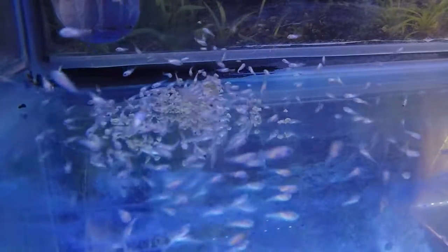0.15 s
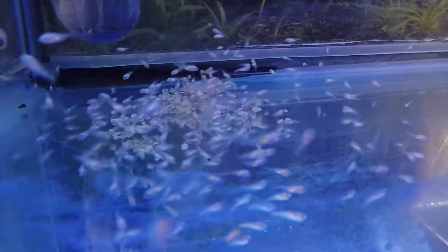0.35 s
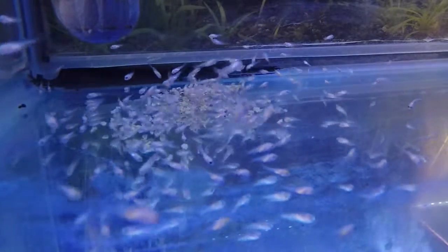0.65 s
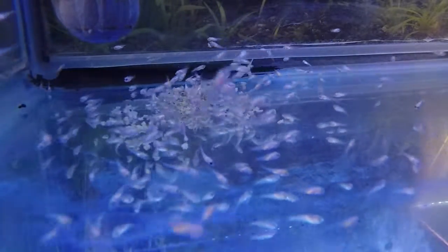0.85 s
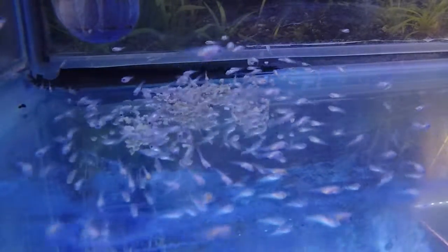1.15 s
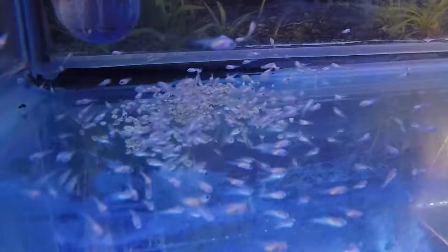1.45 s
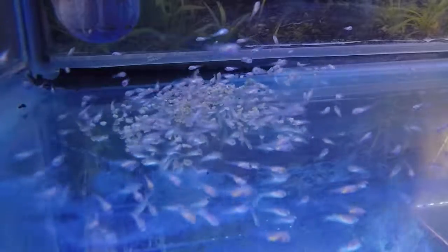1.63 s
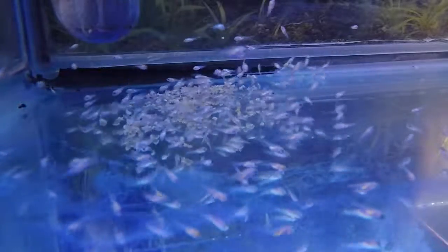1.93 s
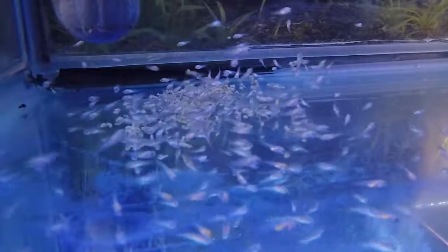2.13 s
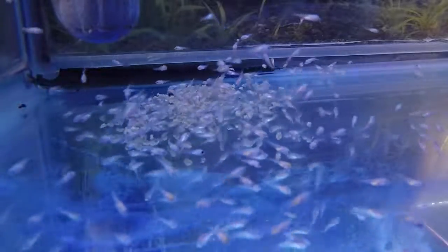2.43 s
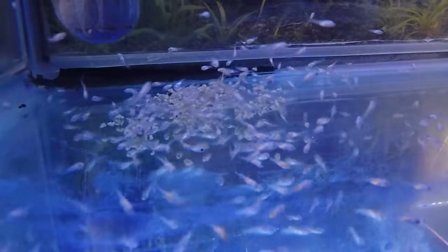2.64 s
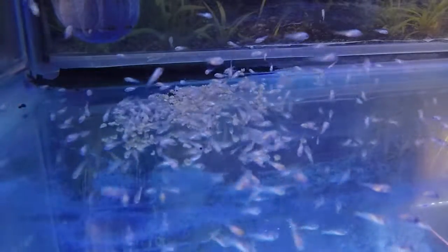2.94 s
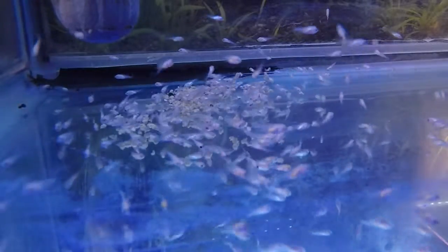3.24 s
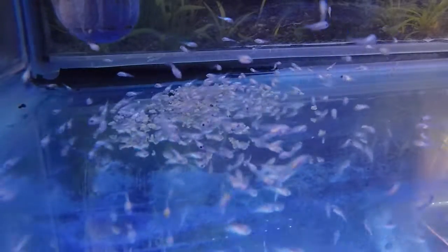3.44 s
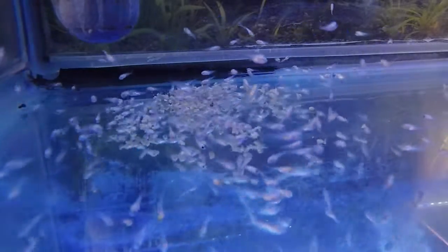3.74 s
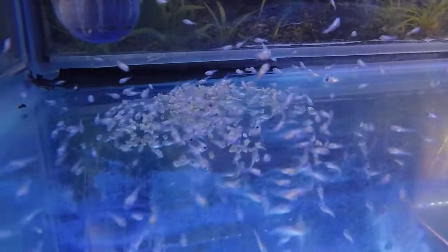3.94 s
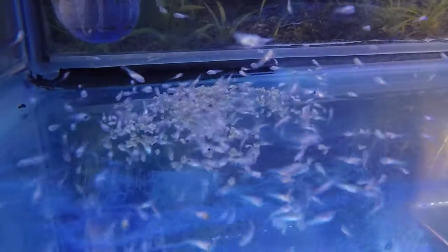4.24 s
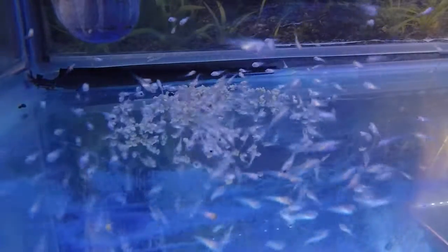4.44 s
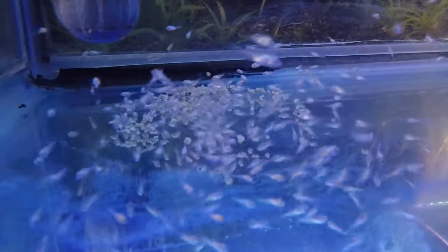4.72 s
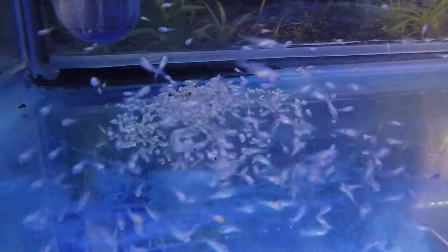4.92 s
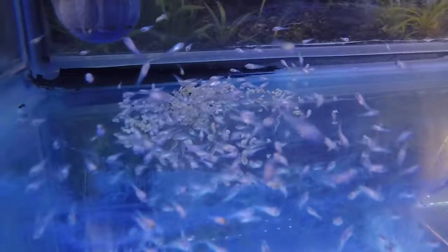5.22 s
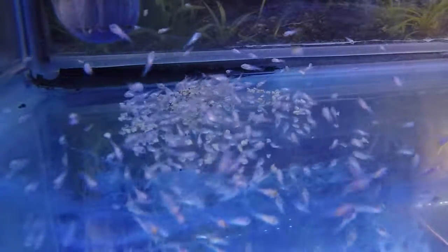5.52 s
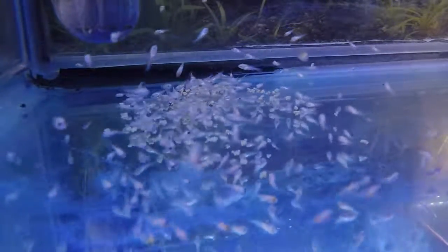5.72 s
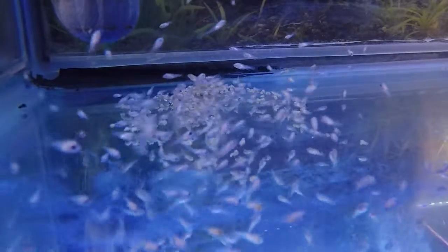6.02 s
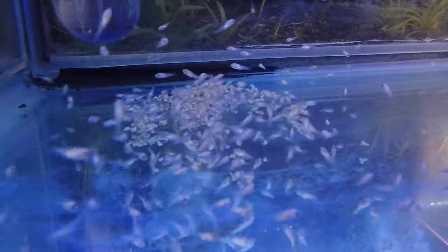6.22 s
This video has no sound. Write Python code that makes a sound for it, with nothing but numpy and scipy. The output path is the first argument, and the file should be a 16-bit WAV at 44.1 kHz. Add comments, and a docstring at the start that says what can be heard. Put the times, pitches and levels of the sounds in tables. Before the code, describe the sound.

A fish tank pump hums low and steady while water trickles and fizzes, with hollow bubble plops bursting loudest near five seconds.

```python
"""An aquarium pump hums at twice the mains frequency and shakes a glass tank in a small room.
From the start water rumbles, churns and trickles beneath a fine fizz of bursting bubbles.
Large bubbles, damped oscillators of rising pitch, plop and knock the tank amid sharp ticks and pings;
one stands out near 1 s, the trickle swells at about 1.6 s, and the strongest plops crowd near 4.9 s.
Noise and swarms of damped sines, shaped by resonances, make the water; pops leave a room tail."""
import sys
import numpy as np
from scipy import signal
from scipy.fft import rfft, irfft, next_fast_len
from scipy.io import wavfile
from scipy.ndimage import map_coordinates

SR = 44100
rng = np.random.default_rng(int(sys.argv[2]) if len(sys.argv) > 2 else 0)


def transcribe(signal):
    """Save signal, clipped to [-1, 1], as a 16-bit WAV file at the path in sys.argv[1]."""
    frames = np.atleast_2d(signal).T
    limited = np.clip(frames, -1, 1)
    pcm = np.round(limited * 32767).astype(np.int16)
    wavfile.write(sys.argv[1], SR, pcm)


N = 280917

# the largest gurgling bubbles; the three levels are relative, each part having its own common trim:
# (time [s], plop level [dB], pitch [Hz], knock level [dB], spatter level [dB])
LARGE_BUBBLES = [(0.3333, -29, 2000, -27.5, -29.5), (0.4724, -33, 1300, -29, -56),
                 (0.7307, -22, 1240, -30, -44), (0.797, -32, 1240, -27, -56),
                 (0.9462, -14, 1323, -27.5, -26), (1.0294, -26, 1340, -44, -48),
                 (1.4326, -28.5, 1940, -55, -38), (1.695, -25, 1400, -38, -40),
                 (1.7419, -29, 1500, -40, -34.5), (2.157, -24, 1530, -35, -34.5),
                 (2.272, -29, 1660, -34, -41), (2.317, -28, 1230, -31, -36.5),
                 (2.3536, -29, 1260, -40, -38), (2.4565, -26, 1235, -32, -38),
                 (2.658, -38, 1190, -32.5, -46), (3.055, -30, 1524, -26.5, -39),
                 (3.1975, -21, 1250, -30.5, -37.5), (3.3442, -28, 1360, -31, -43),
                 (3.5918, -27, 1780, -39, -39), (3.9504, -22.5, 1414, -30, -45),
                 (4.355, -21.5, 1365, -25.5, -40), (4.4357, -31, 1690, -34.5, -44),
                 (4.7964, -32, 1410, -40, -53), (4.8408, -29, 2070, -37, -44),
                 (4.8616, -14.5, 1596, -34, -47), (4.8857, -14.5, 1210, -26.5, -50),
                 (4.9476, -10, 1386, -27, -49), (5.0644, -28, 1180, -31, -55),
                 (5.5908, -28, 1560, -46, -41), (5.691, -28, 1380, -49, -52), (5.8229, -28, 1590, -33, -47),
                 (6.1501, -22.5, 1760, -30.5, -44), (6.176, -19, 1440, -29.5, -47),
                 (6.2314, -19, 1225, -29, -40.5)]


def amp(db):
    """Level law: decibels become a pressure ratio."""
    return 10 ** (np.asarray(db) / 20)


def unit(x):
    """Normalisation of power: scale to rms 1."""
    return x / np.sqrt(np.mean(x ** 2) + 1e-20)


def along(points, hz):
    """Interpolation of (frequency [Hz], value) points on a logarithmic frequency axis."""
    f, v = np.transpose(points)
    return np.interp(np.log(hz + 1), np.log(f + 1), v)


def wobble(rate):
    """Slow random modulation: a smooth curve through rate random knots a second."""
    knots = rng.standard_normal(int(N * rate / SR) + 4)
    return map_coordinates(knots, [np.arange(N) * rate / SR])


def filtered(x, response):
    """Linear filtering: the spectrum of x times a complex response of frequency."""
    size = next_fast_len(N + SR // 2)
    return irfft(rfft(x, size) * response(np.fft.rfftfreq(size, 1 / SR)), size)[:N]


def noise(spectrum):
    """Coloured noise: white noise shaped by a spectral density, rms 1."""
    return unit(filtered(rng.standard_normal(N), lambda hz: amp(along(spectrum, hz))))


def resonate(x, modes, order=1):
    """Modal superposition: x through parallel resonances; order 2 gives steep flanks and deep valleys."""
    def response(f):
        total = 0
        for k, (center, width, db) in enumerate(modes):
            bell = 1j * f * width / (center * center - f * f + 1j * f * width)
            sign = (-1) ** (k * (order + 1))  # neighbours alternate in sign at order 2
            total = total + sign * amp(db) * bell ** order
        return total
    return filtered(x, response)


def add(track, s, sound):
    """Superposition: mix a sound into the track at s seconds."""
    part = track[max(round(s * SR), 0):][:len(sound)]
    part += sound[:len(part)]


def bubble(t, hz, t60, rise, attack):
    """Damped oscillation: a sine whose frequency climbs by the share rise over t60, passing hz at t60 / 5."""
    phase = 2 * np.pi * hz * (t + rise * t * (t / t60 / 2 - 1 / 5))
    return np.sin(phase) * amp(-60 * t / t60) * (1 - np.exp(-t / attack))


def plop(t, hz, t60, swoop, opening):
    """Oscillation of a closing cavity: the pitch swoops up to hz, then rings on; peak 1."""
    closed = 1 - np.exp(-t / opening)
    phase = 2 * np.pi * hz * (t - swoop * opening * closed)
    ring = np.sin(phase) * amp(-60 * t / t60) * closed
    return ring / np.abs(ring).max()


def swarm(count, low_hz, high_hz, t60, size_db):
    """Incoherent sum of many small bubbles of random moment, pitch, life and size, rms 1."""
    t = np.arange(min(round(t60 * SR), 4000000 // count)) / SR
    start = rng.integers(0, N, (count, 1))
    hz = low_hz + (high_hz - low_hz) * rng.random((count, 1))
    life = t60 * rng.uniform(.5, 1.5, (count, 1))
    size = amp(size_db * np.minimum(rng.exponential(size=(count, 1)), 4))
    grains = size * bubble(t, hz, life, rise=0.082, attack=life / 20)
    places = start + np.arange(len(t))
    return unit(np.bincount(places.ravel(), grains.ravel(), N)[:N])


def scattered(count, db, spread_db, low_hz, high_hz):
    """Stratified chance: (time [s], level [dB], pitch [Hz]) rows, one in each equal stretch of time."""
    when, size, pitch = rng.random((count, 3)).T
    s = (np.arange(count) + when) / count * N / SR
    return np.transpose([s, db + spread_db * (2 * size - 1), low_hz + (high_hz - low_hz) * pitch])


def pump():
    """Harmonic excitation: the magnet drive shakes the tank; overtones waver with the impeller's load."""
    # pump overtones: (multiple of the hum frequency [1], relative level [dB])
    overtones = [(1, 0.5), (2, -25.5), (3, -19), (3.5, -51), (4, -22), (5, -27), (6, -47), (7, -56),
                 (8, -27.5)]
    hum_hz = 100
    level_db = -21.5 + 0.88 * wobble(3.39)  # slow drift of the whole hum
    phase = 2 * np.pi * hum_hz * np.arange(N) / SR + 0.14 * wobble(7)
    hum = np.zeros(N)
    for order, db in overtones:
        waver_db = (order > 1) * (1.5 * wobble(9))
        hum += amp(db + waver_db) * np.sin(order * phase + rng.uniform(0, 2 * np.pi))
    return amp(level_db) * unit(hum)


def gurgles():
    """Impulsive modal excitation: a large bubble plops, knocks the tank and sheds two smaller bubbles."""
    # modes of the knocked tank: (frequency [Hz], relative level [dB], decay time t60 [s])
    knock_modes = [(506, -12, 0.073), (658, -8, 0.03), (854, -7, 0.044), (965.4, -3.5, 0.081),
                   (973, -4.5, 0.069), (1242, -15, 0.095)]
    # lesser bubbles at random moments, with knock and spatter tied to the plop
    strays = [(s, db, hz, db - 6, db - 10)
              for s, db, hz in scattered(count=18, db=-32, spread_db=0.5, low_hz=1190, high_hz=1425)]
    out, t = np.zeros(N), np.arange(SR // 6) / SR
    for s, db, hz, knock_db, spatter_db in list(LARGE_BUBBLES) + strays:
        ring = plop(t, hz, t60=0.067, swoop=0.38, opening=0.0014)
        knock = np.zeros(len(t))
        for mode_hz, mode_db, life in knock_modes:
            strength = amp(mode_db + 1.3 * rng.standard_normal()) * rng.choice([-1, 1])
            knock += strength * bubble(t, mode_hz, life, rise=0, attack=0.00035)
        knock /= np.abs(knock).max()
        spatter = np.zeros(len(t))
        for _ in range(2):
            spatter_hz = 1870 * np.exp(0.081 * rng.standard_normal())
            spatter += plop(t, spatter_hz, t60=0.043, swoop=0.21, opening=.0012)
        gurgle = amp(db - 11.5) * ring + amp(knock_db + 5.0) * knock + amp(spatter_db - 3.5) * spatter
        add(out, s, gurgle)
    return out


def wash():
    """Entrainment: each listed large bubble stirs up a short decaying rush of tiny ones under the lid."""
    rise_s, t60_s = .009, 0.12
    level, t = np.zeros(N), np.arange(SR // 4) / SR
    for s, db, *_ in LARGE_BUBBLES:
        add(level, s, amp(db - 22.5 - 60 * t / t60_s) * (1 - np.exp(-t / rise_s)))
    return level * swarm(count=6000, low_hz=950, high_hz=1960, t60=.014, size_db=2.0)


def trickle():
    """Cavity resonance: clustered small bubbles murmur under the lid, room-blurred; finer droplets tinkle."""
    # how strongly small bubbles reach the surface: (time [s], relative level [dB])
    flow = [(0.0, -49), (0.55, -50.5), (0.87, -51.5), (1.19, -51.5), (1.44, -51), (1.63, -44.5),
            (2.06, -47), (2.34, -45.5), (2.62, -52.5), (3.39, -50), (3.56, -50), (4.83, -50), (5.04, -51),
            (5.36, -51), (5.94, -48.5), (6.37, -47.5)]
    # resonances of the air under the lid: (frequency [Hz], width [Hz], relative level [dB])
    lid_modes = [(1030, 70, -9), (1218, 42, 4), (1320, 75, -1), (1390, 60, -3), (1510, 60, -7),
                 (1610, 90, -3), (1750, 140, -2), (1950, 220, -10), (2150, 130, -14)]
    flow_db = np.interp(np.arange(N) / SR, *np.transpose(flow))
    bubbles = swarm(count=2200, low_hz=990, high_hz=2118, t60=0.038, size_db=2.5)
    bubbles = bubbles + amp(-5.0) * room(bubbles)
    under_lid = unit(resonate(bubbles, lid_modes, order=2))
    murmur = unit(under_lid + amp(-12) * unit(bubbles))
    droplets = swarm(count=700, low_hz=1976, high_hz=3430, t60=0.029, size_db=4)
    cluster_db = 2.3 * wobble(14)
    return amp(flow_db - 0.5 + cluster_db) * murmur + amp(-62.5) * droplets


def lid_ring():
    """Sustained resonance: runs of like-sized bubbles, as swells of noise, keep the lid's air ringing."""
    # the lid's sharpest resonance: (frequency [Hz], width [Hz], relative level [dB])
    sharp_mode = [(1218.5, 27, 0)]
    # runs of bubbles: (middle time [s], length [s], level [dB])
    bubble_runs = [(0.737, 0.11, -46), (2.42, 0.2, -50), (5.17, 0.25, -44)]
    t = np.arange(N) / SR
    swell = sum(amp(db) * np.exp(-np.abs(2 * (t - s) / length) ** 2) for s, length, db in bubble_runs)
    return swell * unit(resonate(rng.standard_normal(N), sharp_mode, order=2))


def fizz():
    """Broadband excitation of modes: tiny bubbles, each at its own pitch, ring the glass and rim."""
    # high resonances of the glass and rim: (frequency [Hz], width [Hz], relative level [dB])
    rim_modes = [(3230, 800, -14), (3595, 110, 0.5), (4344, 170, -8.5), (4700, 460, -31),
                 (5120, 130, -21.5), (5560, 230, -13.5), (6115, 430, -14), (8080, 320, -24.5),
                 (8570, 400, -21.5), (9660, 790, -27.5), (10400, 580, -22), (11700, 1200, -29.5),
                 (12700, 600, -32), (14000, 950, -27.5), (15800, 500, -10.5)]
    fine = swarm(count=5500, low_hz=2510, high_hz=6850, t60=0.0048, size_db=3.5)
    finest = swarm(count=9000, low_hz=7140, high_hz=14700, t60=0.0025, size_db=3.5)
    spray = fine + amp(2.5) * finest + amp(2.5) * rng.standard_normal(N)
    return amp(-49 + 0.44 * wobble(13)) * unit(resonate(spray, rim_modes, order=2))


def ticks():
    """Transient radiation: a sharp burst is a short noise crack with a high damped ping."""
    # sharp bursts at the surface: (time [s], relative level of the ping [dB], pitch [Hz])
    sharp_bursts = [(1.2797, -35, 6400), (1.3835, -37, 13090), (1.6368, -35, 13950), (1.9952, -33, 10800),
                    (2.269, -30, 10100), (2.7288, -33, 6850), (2.9109, -34, 10160), (3.0441, -42, 9130),
                    (4.6779, -32, 14990), (4.9728, -28, 6200), (5.5029, -23, 4160)]
    faint = scattered(count=16, db=-44, spread_db=2, low_hz=5500, high_hz=13500)
    out, t = np.zeros(N), np.arange(SR // 12) / SR
    snap = noise([(2000, -30), (5000, 9), (15000, 0)])  # (frequency [Hz], relative density [dB])
    for s, db, hz in list(sharp_bursts) + list(faint):
        crack = amp(-45.0 - 60 * t / 0.0078) * np.roll(snap, rng.integers(N))[:len(t)]
        ping = amp(db + 2) * bubble(t, hz, t60=0.0071, rise=0.044, attack=0.00099)
        add(out, s, crack + ping)
    return out


def pings():
    """Free vibration: bursts close to the rim set its main resonance ringing."""
    # the strongest bursts that catch the rim: (time [s], level [dB])
    rim_bursts = [(0.8405, -30), (1.1662, -35), (3.5674, -34), (5.4964, -33.5)]
    rim_hz = 3582
    faint = scattered(count=14, db=-39.5, spread_db=2, low_hz=rim_hz, high_hz=rim_hz)
    out, t = np.zeros(N), np.arange(SR // 8) / SR
    for s, db, *_ in list(rim_bursts) + list(faint):
        add(out, s, amp(db) * bubble(t, rim_hz, t60=0.13, rise=0, attack=0.0011))
    return out


def churn():
    """Flow noise: the outflow churns, sloshes in the tank's resonances and glugs with mid-sized bubbles."""
    # noise of the churning water: (frequency [Hz], relative density [dB])
    churn_spectrum = [(100, -0.5), (200, -19), (280, 0), (360, 1.5), (550, 2), (720, -3.5), (1000, -9.5),
                      (1120, -46), (1400, -14.5), (1900, -28), (2400, -34), (3000, -40), (3900, -37),
                      (7400, -65)]
    # low resonances of the tank and its water: (frequency [Hz], width [Hz], relative level [dB])
    tank_modes = [(458.3, 9.8, 6.5), (525.4, 11.7, 5), (661, 13.4, 1), (806, 18, 0.5), (952, 19, -13.5)]
    churning = amp(-41.5 + .8 * wobble(11)) * noise(churn_spectrum)
    slosh = amp(-41.5 + 1.35 * wobble(14)) * unit(resonate(rng.standard_normal(N), tank_modes))
    glugs = amp(-45.5) * swarm(count=500, low_hz=350.6, high_hz=929, t60=0.056, size_db=0.0)
    return churning + slosh + glugs


def rumble():
    """Turbulent excitation: low noise in random surges drives the booming of the stand and room."""
    # turbulence that drives the booming: (frequency [Hz], relative density [dB])
    turbulence = [(8, -26), (27, 3.5), (280, -2), (420, -20), (1000, -60)]
    # booming of the stand and room: (frequency [Hz], width [Hz], relative level [dB])
    boom_modes = [(27.2, 7.3, -0.5), (39.7, 17, 4.5), (56, 11, -5), (76.4, 5.7, 5), (105, 16, -8.5),
                  (130.8, 7.5, 0), (151.5, 6, -5), (161.3, 3, -8), (235, 30, -8.5), (283, 23, -10.5)]
    surge_db = 0.9 * wobble(8)
    return amp(-31.5 + surge_db) * unit(resonate(noise(turbulence), boom_modes))


def room(x):
    """Diffuse reverberation: a noise tail whose treble decays faster, so it dulls as it dies."""
    # reverberation of the room: (frequency [Hz], decay time t60 [s])
    decay = [(200, 0.95), (1500, 0.051), (10000, 0.015)]
    hz, t, z = signal.stft(rng.standard_normal(SR // 3), SR, nperseg=256)
    fade = amp(-60 * t / along(decay, hz)[:, None])
    tail = signal.istft(z * fade, SR, nperseg=256)[1]
    return signal.fftconvolve(x, tail / np.linalg.norm(tail))[:N]


def scene():
    """Superposition of pump, water and bubbles, close by; only the pops gain a room tail here."""
    pops = gurgles() + wash() + ticks() + pings()
    steady = pump() + trickle() + lid_ring() + fizz() + churn() + rumble()
    return (steady + pops + amp(-12.0) * room(pops))[None]


def record(dry):
    """Interference: the microphone's port cancels narrow treble bands; a band limit removes the top."""
    # narrow dips in the treble: (frequency [Hz], width [Hz], level of the cancelling part [dB])
    port_dips = [(3950, 260, -8), (5030, 70, -6), (7420, 520, -5), (9030, 220, -10), (11130, 260, -7),
                 (14620, 320, -8)]
    top_hz = 15400
    return np.array([filtered(x - resonate(x, port_dips), lambda hz: hz < top_hz) for x in dry])


dry = scene()
out = record(dry)
transcribe(out)
```